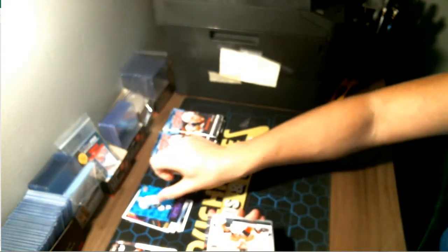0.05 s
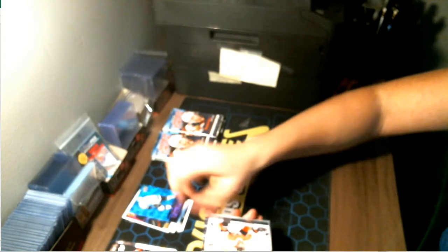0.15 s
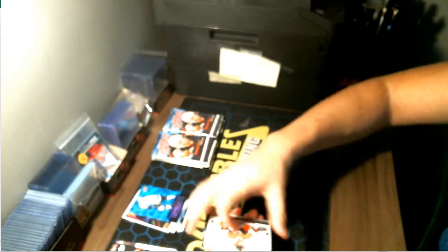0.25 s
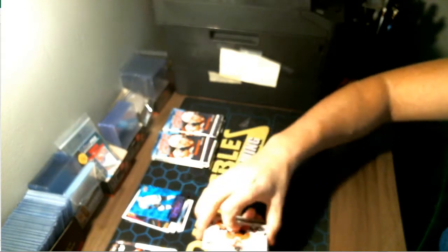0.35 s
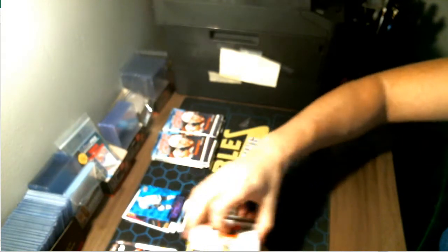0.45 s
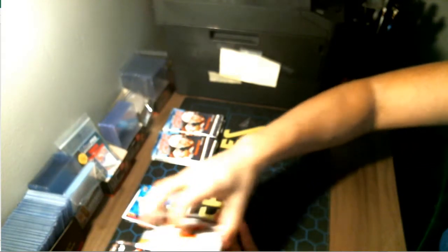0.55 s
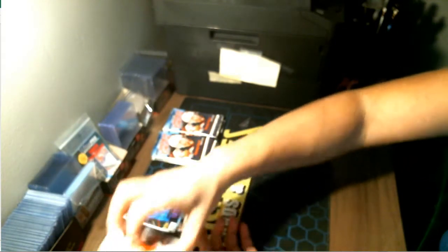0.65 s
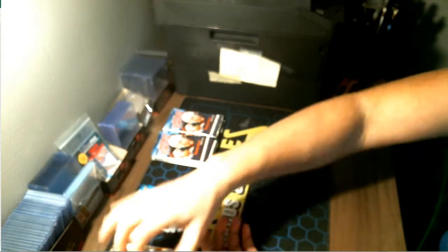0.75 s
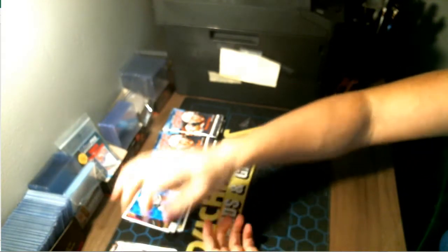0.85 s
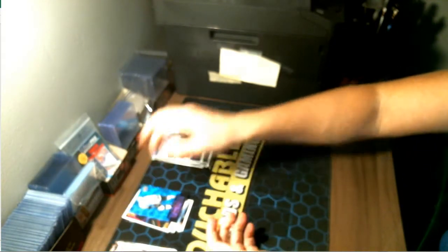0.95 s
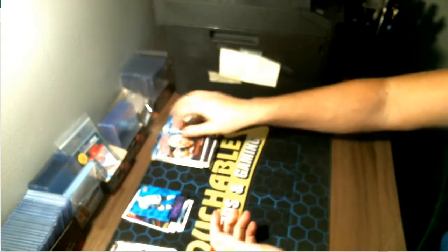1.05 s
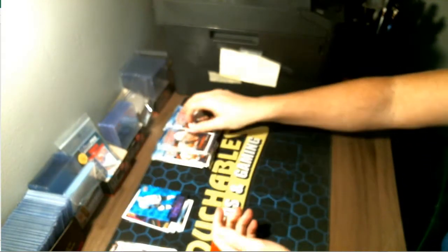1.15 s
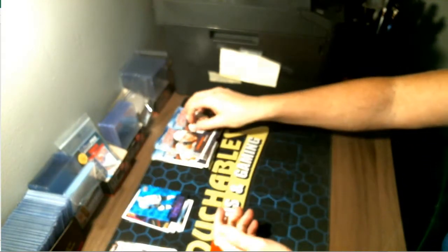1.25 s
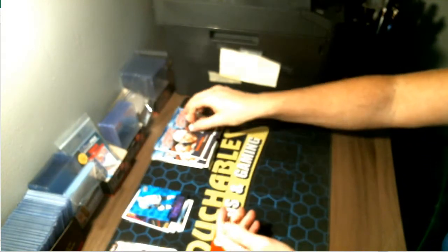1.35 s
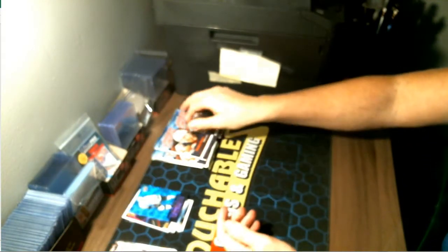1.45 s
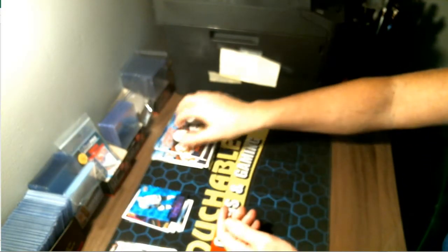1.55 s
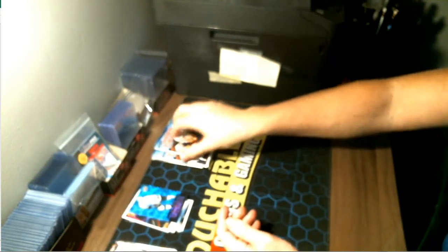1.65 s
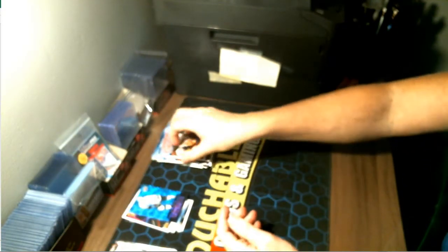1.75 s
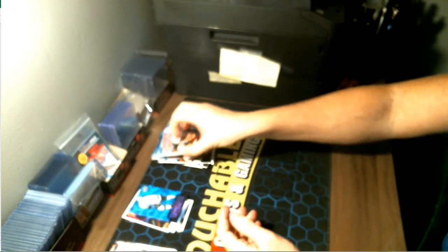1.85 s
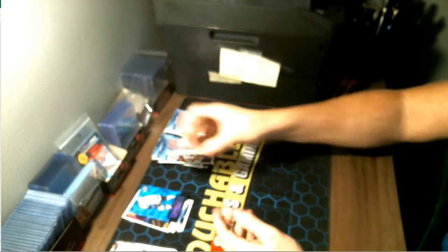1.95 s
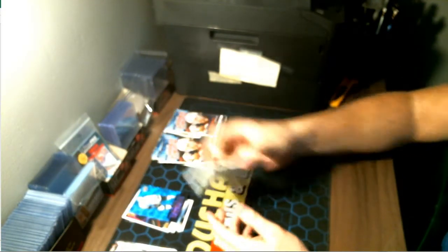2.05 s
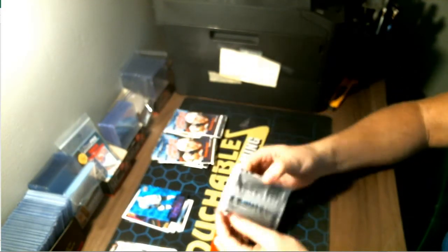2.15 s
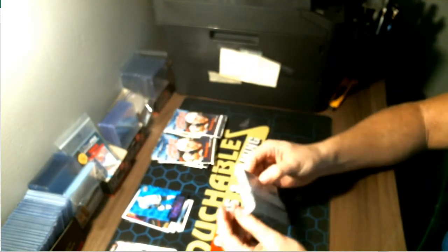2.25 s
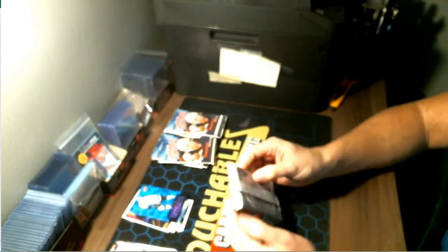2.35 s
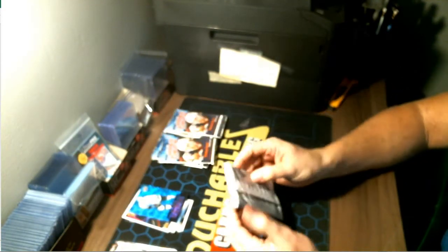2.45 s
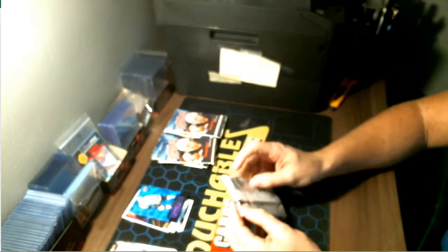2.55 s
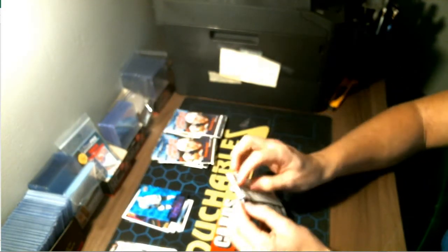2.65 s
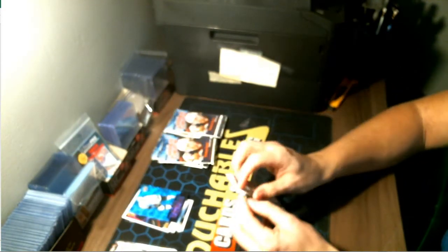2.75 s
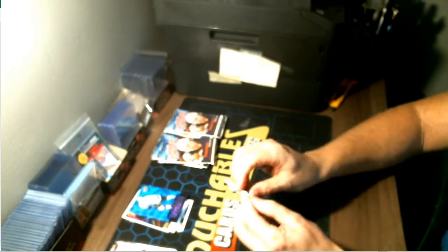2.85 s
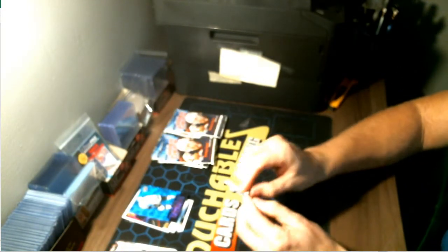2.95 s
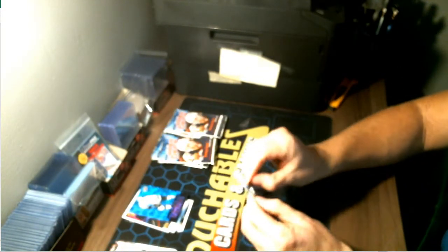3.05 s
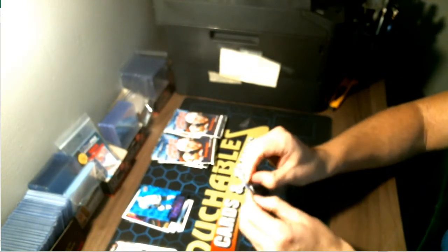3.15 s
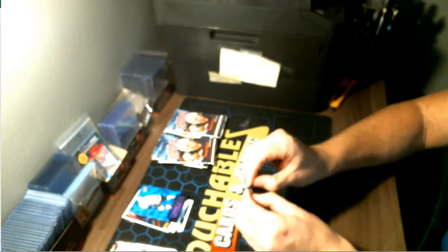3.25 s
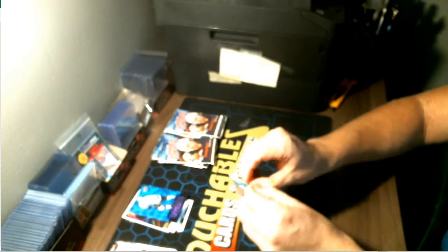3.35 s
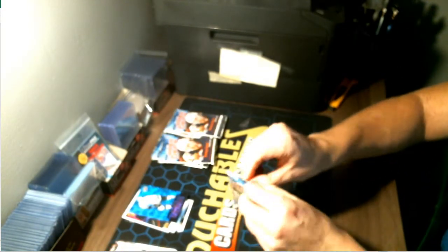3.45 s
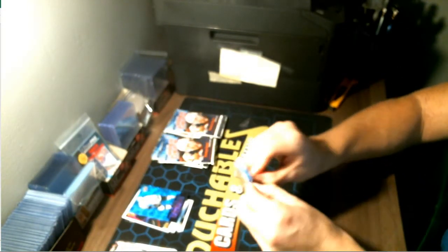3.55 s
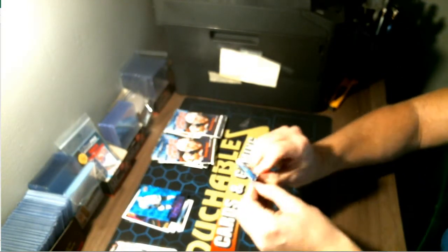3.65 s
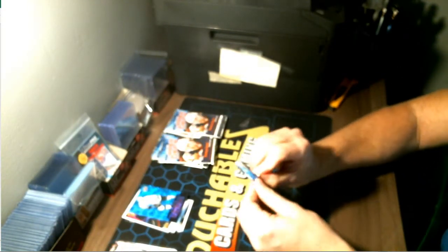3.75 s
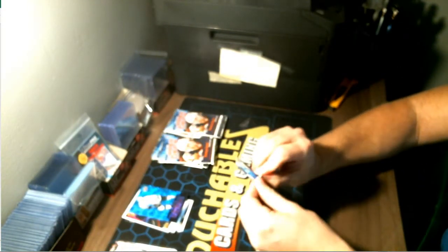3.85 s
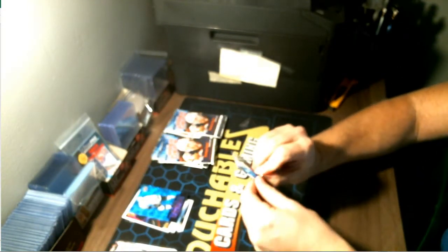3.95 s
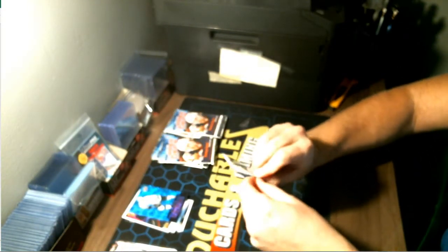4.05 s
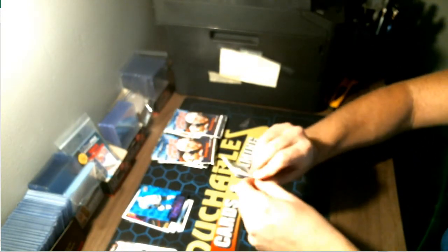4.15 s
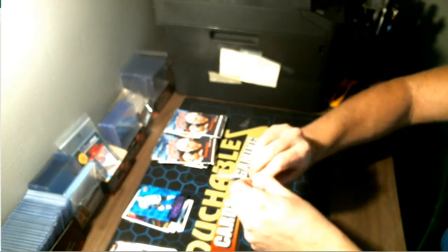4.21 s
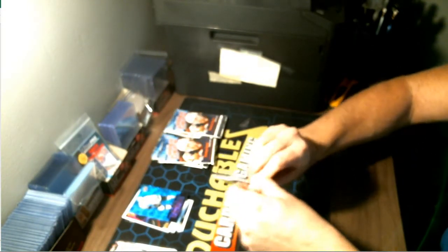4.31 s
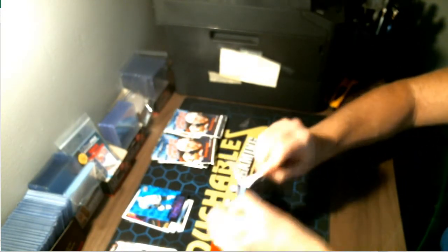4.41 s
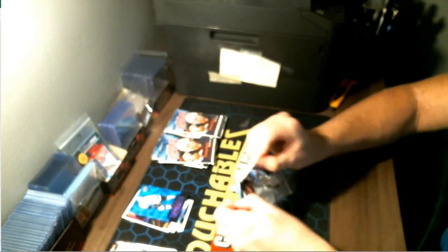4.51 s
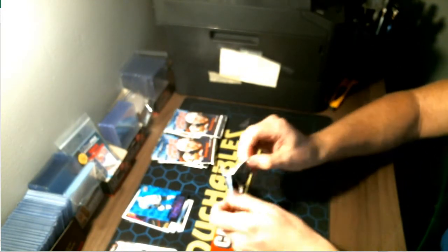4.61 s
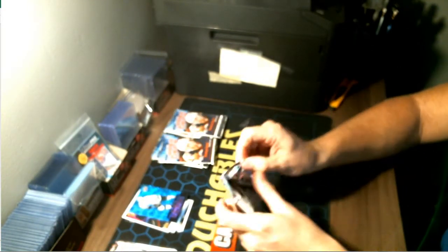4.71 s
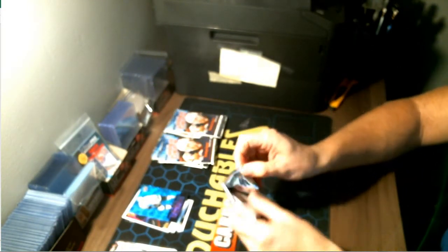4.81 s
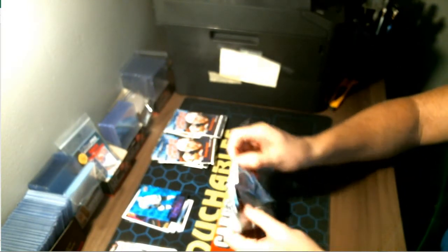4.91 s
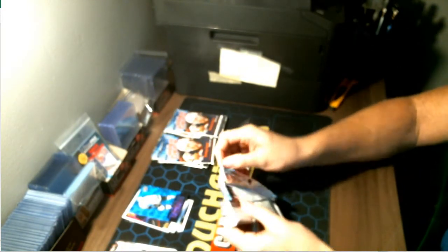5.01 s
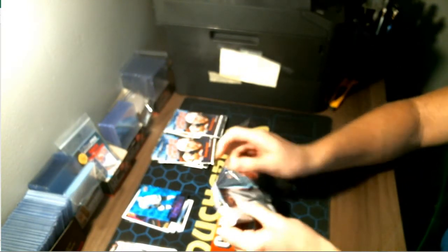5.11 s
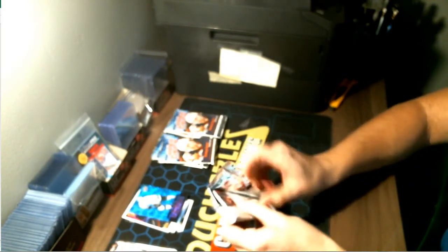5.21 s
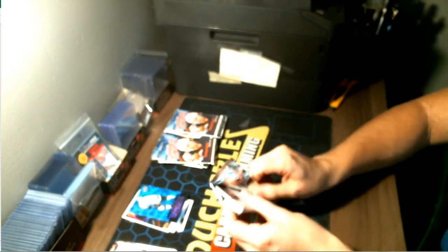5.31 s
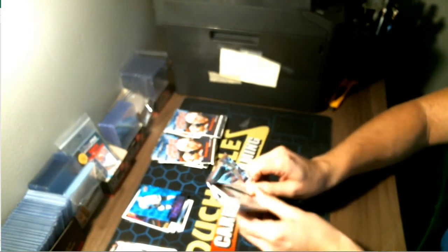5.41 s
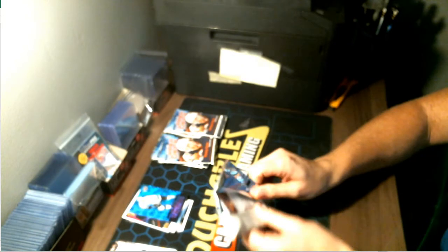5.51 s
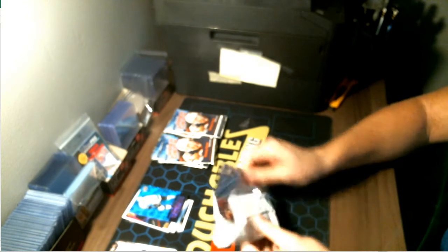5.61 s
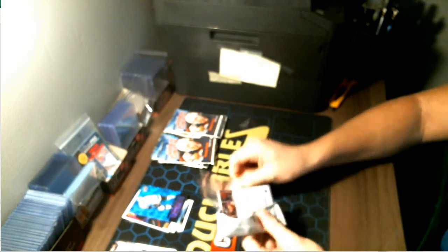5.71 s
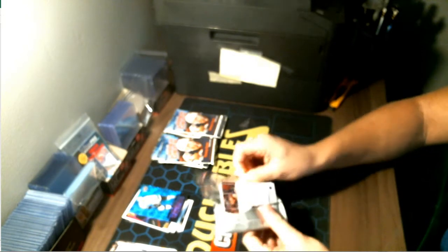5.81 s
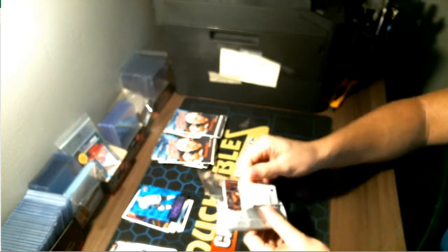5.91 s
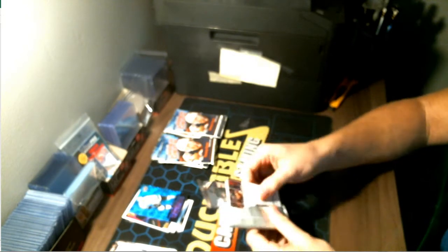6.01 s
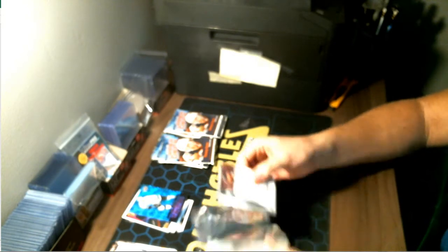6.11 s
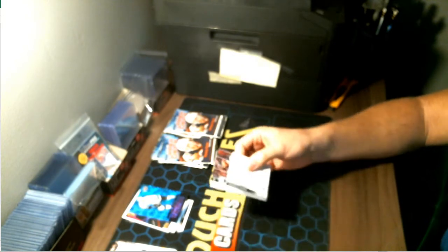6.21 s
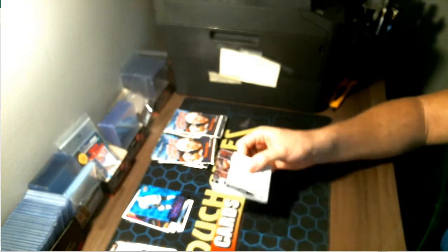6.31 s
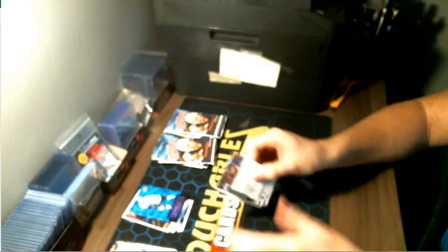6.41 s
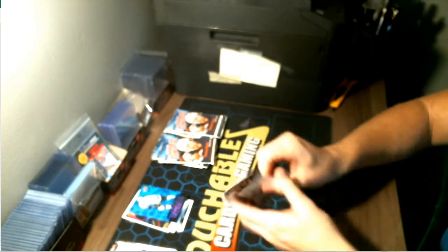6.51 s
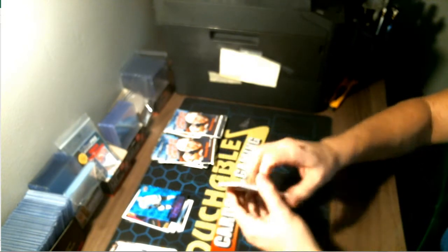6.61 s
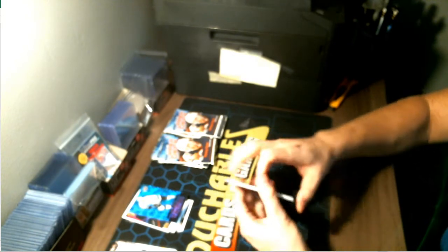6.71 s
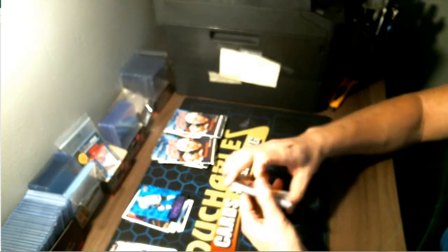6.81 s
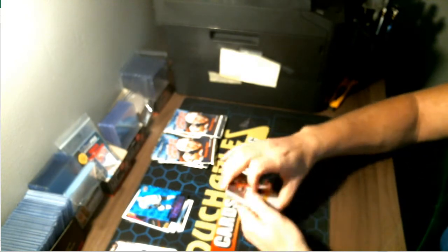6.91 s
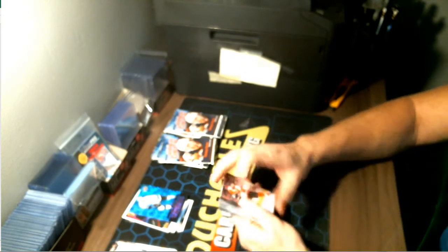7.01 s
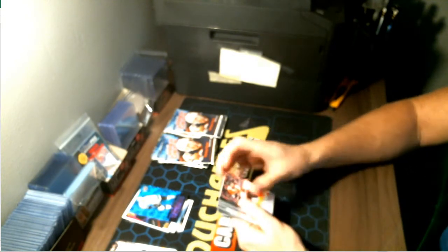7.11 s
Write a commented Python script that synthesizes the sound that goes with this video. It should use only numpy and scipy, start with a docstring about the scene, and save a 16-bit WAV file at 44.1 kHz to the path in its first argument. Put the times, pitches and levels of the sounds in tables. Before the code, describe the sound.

A card tap thuds on a desk, cards slide softly, then a foil wrapper crackles and tears in sharp bright snaps close by in a small room.

```python
"""Cards slide and are set down on a desk in a small room; then foil is crumpled and torn close to a webcam,
its sharp snaps (clicks with ringing facets) riding on a dense crackle (noise grains); at the end cards slide again.
Decaying low modes make the thumps of desk taps and of overload under the loudest snaps; leaning hands rumble and
noise tails make the room. Throughout lie air hiss and the webcam's whine and once-a-frame buzz, while its noise
suppressor shuts on the tails."""
import sys
import numpy as np
from scipy import signal
from scipy.fft import rfft, irfft, next_fast_len
from scipy.io import wavfile
from scipy.ndimage import uniform_filter1d

SR = 44100
rng = np.random.default_rng(int(sys.argv[2]) if len(sys.argv) > 2 else 0)


def bounce(signal):
    """Save signal as a 16-bit WAV file at the path given by the first command-line argument."""
    frames = np.transpose(np.atleast_2d(signal))
    limited = np.clip(frames, -1, 1)
    pcm = np.round(limited * 32767).astype(np.int16)
    wavfile.write(sys.argv[1], SR, pcm)


N = 316108  # length in samples

# Levels are mix settings; the functions trim them further.
# Foil and card snaps: start_s, peak_db, body_db (below 2 kHz, re peak), edge_db (above 7 kHz, re peak), facet_hz
FOIL_AND_CARD_SNAPS = [(0.1314, -39, -1, -62, 4020), (0.3442, -34, 3, 0, 2300),
                       (0.5534, -42.5, -3, -11.5, 4100), (0.558, -49.5, 6, 6, 1720),
                       (0.5641, -45, -0.5, -18, 4330), (0.5904, -13, 6.5, -8.5, 2580),
                       (0.5948, -11.5, -0.5, -9, 1600), (0.946, -37, -2, -3, 1000),
                       (0.9527, -33, -14.5, 0, 4070), (0.9599, -39.5, -4, -0.5, 3940),
                       (0.9856, -39.5, -6, -12, 5400), (1.0332, -28.5, -6.5, -3, 5970),
                       (1.0493, -46.5, 3, -6, 3850), (1.0568, -33, -8.5, -13.5, 1430),
                       (1.0614, -34, 2, 1.5, 1350), (1.1171, -46, -11, -4, 2520),
                       (1.2472, -50.5, -14, 0, 8260), (1.2804, -52.5, -11.5, -8, 5800),
                       (1.5109, -45, 4, -26, 1740), (1.52, -47, 1, -9, 1360),
                       (1.6436, -41, -6.5, -5.5, 3140), (1.6997, -46.5, -8, -16.5, 5720),
                       (1.7118, -45, -9, -21, 4540), (1.958, -33, -3, -2, 7500),
                       (1.9655, -38.5, -3.5, -8, 4860), (1.9847, -45, -12, -20, 4240),
                       (1.997, -21.5, -27, 1.5, 4430), (2.0169, -31, -16.5, -44, 2880),
                       (2.0342, -10, -7.5, -2.5, 10150), (2.0568, -18.5, -8, -2, 8150),
                       (2.0715, -23.5, -13, 2, 3200), (2.085, -26, -7, 1, 7770),
                       (2.1679, -24, -17, -4.5, 4460), (2.1997, -28.5, -4, -4, 4030),
                       (2.209, -22, -30, -10, 3750), (2.2579, -39, -18.5, 1.5, 7020),
                       (2.3246, -45, -17, -1, 4160), (2.376, -25.5, -4.5, -6, 4380),
                       (2.45, -29.5, -5, -6, 2450), (2.4787, -34, -5, -5.5, 2930),
                       (2.5118, -32, -8, -5, 4200), (2.5387, -18.5, -13.5, -3.5, 2004),
                       (2.5671, -27, -22.5, -1.5, 6140), (2.5804, -17.5, -9, 1, 7860),
                       (2.5917, -28.5, -5, -3, 3260), (2.6541, -37, -18.5, -3.5, 3230),
                       (2.6773, -14.5, -15.5, 2.5, 5080), (2.6978, -16.5, -14, 4.5, 5400),
                       (2.7112, -22.5, 0, -8, 4040), (2.7183, -20.5, -15.5, -1.5, 6200),
                       (2.7676, -23.5, -13.5, 1.5, 5000), (2.7842, -36.5, -23, 4, 5100),
                       (2.8306, -33, -2, -3, 4340), (2.8362, -31.5, -14.5, 4, 10900),
                       (2.8521, -10.5, -18.5, -2.5, 5600), (2.9005, -12.5, -8.5, 4, 10780),
                       (2.9445, -27, -17.5, 0, 2160), (3.026, -43.5, 3, -14, 1620),
                       (3.042, -36.5, 5, 9, 8700), (3.056, -36.5, -7, -12, 4370),
                       (3.0738, -26.5, -22, -1, 4500), (3.0923, -29.5, -11, 0.5, 3960),
                       (3.1778, -44, 4.5, -1, 6400), (3.2024, -45, -9, 18, 10400),
                       (3.3799, -38.5, -22.5, -2.5, 5180), (3.3861, -25.5, -15.5, -1.5, 6290),
                       (3.3937, -6.5, -21, -2, 9500), (3.4029, -22.5, -10, -1, 9090),
                       (3.4149, -25, -11.5, -4, 6350), (3.4332, -20, -2.5, 3, 4930),
                       (3.4449, -17.5, -8, 5.5, 5640), (3.4522, -17, -17.5, -2.5, 4540),
                       (3.4619, -19.5, -19, -6, 4500), (3.469, -7.5, -22.5, -9.5, 3740),
                       (3.4961, -22, -19.5, 1, 4460), (3.5317, -31, -17, 1.5, 5210),
                       (3.5433, -15.5, -12.5, 6.5, 6100), (3.6263, -37, -27.5, 2, 4900),
                       (3.635, -18.5, -10, -7.5, 4760), (3.6483, -17, -14, -0.5, 4750),
                       (3.7872, -37.5, -14.5, 7.5, 9300), (3.81, -28.5, -16.5, -0.5, 7670),
                       (3.8484, -14.5, -24, -5, 5870), (3.8565, -27.5, -14, -8, 4440),
                       (3.9343, -32.5, -17, -2, 5020), (3.9703, -12.5, -22.5, -2, 6270),
                       (4.0083, -27, -7, 1.5, 4740), (4.0293, -21.5, -8, 0, 4200),
                       (4.0392, -33, -5.5, -5.5, 5380), (4.1105, -9, -18, -7.5, 1880),
                       (4.1448, -22.5, -8.5, -6.5, 5700), (4.1827, -28.5, -7.5, -4, 5900),
                       (4.2074, -28.5, -9.5, 6.5, 10000), (4.2123, -9.5, -11, -1, 9910),
                       (4.2184, -7.5, -15, -5, 7470), (4.2312, 3.5, -10.5, -1.5, 1740),
                       (4.2467, 5.5, -13.5, -4.5, 1720), (4.2755, -9, -11.5, -4, 3770),
                       (4.2977, -9, -7.5, -2, 5000), (4.3296, -14.5, -17, -2, 5600),
                       (4.3434, -19, -20, -2, 6000), (4.3885, -26.5, -6, -14, 4700),
                       (4.4477, -35, 2, -17, 4900), (4.46, -11.5, -11, -3, 5500),
                       (4.5202, -26, -4, 1, 3380), (4.5454, -31.5, -3, -10, 2100),
                       (4.561, -25.5, -16, -1, 4050), (4.6705, -36.5, 1.5, -1.5, 1210),
                       (4.6774, -37, -3.5, -1, 9300), (4.6871, -26, -9.5, -25.5, 2540),
                       (4.6968, -34, -7.5, -18.5, 2750), (4.7079, -24.5, -5.5, -1, 9600),
                       (4.7503, -32.5, 4, -20, 1000), (4.7753, -31.5, -8.5, 1, 1130),
                       (4.78, -23, -4.5, -5.5, 1180), (4.7881, -20, -4, -2, 5400),
                       (4.796, -25, -6.5, -9.5, 5100), (4.8044, -26.5, -4, -5.5, 1160),
                       (4.8153, -15.5, -10.5, -4, 6350), (4.8235, -25.5, -3.5, -4, 1230),
                       (4.8432, -23.5, -5, 0, 5660), (4.8516, -24.5, -20.5, -0.5, 6040),
                       (4.8697, -42, -9, 8, 9100), (4.9089, -32, -5.5, -4, 4930),
                       (4.926, -34, -10.5, -3, 3850), (4.9332, -32.5, -14, -3, 5080),
                       (4.938, -28.5, -12.5, -2, 6100), (4.9433, -27, -5, -2.5, 2000),
                       (4.9651, -20.5, -7, -0.5, 3800), (4.9718, -20.5, -4.5, -1, 8240),
                       (5.0889, -44, -23, -5, 5470), (5.0936, -39, -30, -16, 5600),
                       (5.118, -35.5, -22, -7, 5530), (5.1457, -49.5, -14.5, 1, 5350),
                       (5.1597, -25, -34.5, -4.5, 5990), (5.1644, -27.5, -16.5, 10, 7830),
                       (5.1725, -37.5, -2, 4, 9300), (5.1795, -23.5, -8, -10, 4030),
                       (5.2249, -36, -1.5, -18, 2410), (5.2388, -39.5, -7.5, -7, 2590),
                       (5.3381, -37.5, -9.5, -2, 5860), (5.3436, -27, -9.5, 0, 6650),
                       (5.3521, -31, -7, 1, 6570), (5.3585, -26.5, -16, -1, 6980),
                       (5.3742, -19, -18.5, 0, 4370), (5.3832, -18.5, -6, 6, 9600),
                       (5.3929, -18.5, -7.5, -3, 4440), (5.4004, -19.5, -10, -2.5, 9470),
                       (5.4077, -13.5, -2.5, -1.5, 10500), (5.4145, -26, -2, 3, 8000),
                       (5.4203, -21.5, -2.5, 5, 7700), (5.4282, -17.5, -7.5, -0.5, 6100),
                       (5.4366, -6, -16.5, -16.5, 4100), (5.4509, -6, -18, 3.5, 6700),
                       (5.4629, -7, -6, -6, 3620), (5.4692, 4.5, -7, -4, 970),
                       (5.4784, -5, -2.5, -2.5, 1563), (5.4904, -6.5, 0.5, 1.5, 1790),
                       (5.5, -7.5, -0.5, 2, 1205), (5.5285, -11.5, -7, 2, 4140),
                       (5.5404, -12, -6, -8.5, 3870), (5.5561, -12, -9.5, -0.5, 5640),
                       (5.5654, -11.5, -16.5, 0.5, 6330), (5.5841, -27.5, -1.5, -3.5, 1550),
                       (5.5953, -20, -2, -9.5, 2020), (5.6032, -12.5, -4.5, -3.5, 1660),
                       (5.6125, -25, -6.5, 3, 5320), (5.7729, -17.5, -3.5, -7, 4390),
                       (5.8162, -16, -0.5, 1.5, 5800), (5.8849, -40, -3, -1.5, 4100),
                       (5.9745, -25.5, -15.5, 2, 5800), (5.9787, -20, -8.5, -5, 1460),
                       (5.9912, -22.5, -16.5, -5.5, 5300), (6.0647, -60, 7, -14, 1090),
                       (6.0871, -36, 7.5, -17, 1570), (6.094, -27, -5.5, -3.5, 6900),
                       (6.1005, -29, 3, 2.5, 7800), (6.108, -24, 1.5, 0.5, 1520),
                       (6.1173, -18, -14.5, -10.5, 2940), (6.1227, -19, 0.5, -14, 1100),
                       (6.1728, -29, -6.5, -6, 1740), (6.1801, -41, -4, 0.5, 3840),
                       (6.3426, -51.5, -15, 1.5, 5250), (6.427, -44, -21.5, 2.5, 5890),
                       (6.476, -51, -4.5, 1, 6500), (6.549, -49, -20.5, 8, 8480),
                       (6.5877, -53, -16.5, -9, 4350), (6.6057, -47, -8, -2, 4090),
                       (6.6133, -45, -1, 1, 1870), (6.853, -47.5, -2, -3, 2690)]
# Snap bands, bright edge, core and full body: freq_hz, density_db (per Hz)
SNAP_EDGE_COLOUR = [(4500, -34), (7000, 0.5), (10500, 0.5), (13000, -8.5), (17000, -36)]
SNAP_CORE_COLOUR = [(1200, -28.5), (2000, -2.5), (4000, 3), (7000, -1), (10000, -48.5)]
SNAP_BODY_COLOUR = [(20, -34.5), (200, -14), (600, -6.5), (1800, -0.5), (3200, -37.5)]
# Strokes of the hands on the foil, one list a stroke: time_s, crackle_db, bulk_db
FOIL_STROKES = [
    [(1.94, -85.5, -77), (1.95, -45.5, -57.5), (2.04, -33, -40.5), (2.138, -45, -51.5), (2.204, -36, -42),
     (2.318, -52, -84.5), (2.37, -36, -41.5), (2.52, -71.5, -51)],
    [(2.82, -49.5, -64), (2.85, -18.5, -46.5), (3.026, -59, -59.5), (3.092, -35, -46), (3.144, -71, -73),
     (3.208, -51, -56), (3.25, -79, -85.5)],
    [(3.36, -100, -96), (3.394, -11.5, -25.5), (3.408, -30, -36.5), (3.466, -23, -39.5), (3.52, -44, -57)],
    [(4.19, -38, -54.5), (4.234, -6.5, -13), (4.444, -49.5, -53.5), (4.46, -11.5, -33.5),
     (4.476, -33.5, -37), (4.594, -46, -48), (4.62, -79, -65)],
    [(4.66, -51, -45.5), (4.686, -25.5, -32), (4.746, -44, -36.5), (4.814, -22.5, -29.5),
     (4.892, -45.5, -52), (4.978, -38.5, -28.5), (5.06, -95, -65.5)],
    [(5.08, -70, -69), (5.092, -52.5, -43), (5.15, -45.5, -58), (5.166, -25.5, -48.5), (5.3, -78.5, -64.5)],
    [(5.32, -68, -76), (5.342, -37, -44.5), (5.46, -12.5, -14), (5.48, -18.5, -8), (5.614, -35, -30.5),
     (5.73, -60.5, -65.5), (5.76, -70, -76.5)],
    [(5.85, -37.5, -34.5), (5.946, -40.5, -60), (5.98, -25.5, -34), (6.048, -65.5, -63.5),
     (6.12, -32.5, -26.5), (6.188, -52.5, -52), (6.25, -71.5, -83.5)],
]
# Fine foil crackle and bulk of the wrapper: freq_hz, density_db (per Hz)
CRACKLE_COLOUR = [(1000, -32), (2500, -14.5), (4500, 9.5), (10000, 8), (13000, -6.5), (17000, -30.5)]
BULK_COLOUR = [(100, -30), (350, -9.5), (700, 0.5), (1200, 1), (2400, -21.5), (4500, -38)]
# Cards sliding over cards and mat, one list a stroke: time_s, hiss_db, scrape_db
CARD_STROKES = [
    [(0.0, -56, -68), (0.06, -95.5, -89.5), (0.118, -94, -79.5), (0.13, -53, -60), (0.2, -88, -81),
     (0.234, -53.5, -58), (0.3, -91.5, -96.5)],
    [(0.93, -90, -82.5), (0.95, -46, -48.5), (1.024, -55, -63.5), (1.032, -39.5, -38), (1.068, -51.5, -52),
     (1.194, -87.5, -86.5), (1.286, -58, -80.5), (1.32, -98.5, -89)],
    [(1.49, -96, -92.5), (1.508, -54, -59.5), (1.654, -57.5, -66.5), (1.684, -76, -81.5), (1.714, -57, -60),
     (1.76, -103, -84)],
    [(6.2, -55, -50), (6.226, -72, -72), (6.264, -78.5, -80), (6.534, -57.5, -71), (6.55, -52.5, -60.5),
     (6.584, -65, -74.5), (6.614, -52.5, -52), (6.652, -69.5, -81), (6.72, -81, -85.5)],
    [(6.82, -91, -100), (6.858, -66, -63.5), (6.888, -95, -94), (6.9, -98, -96.5)],
]
# Card hiss and duller scrape: freq_hz, density_db (per Hz)
CARD_HISS_COLOUR = [(1800, -30), (3500, -0.5), (7000, 0.5), (11000, -1.5), (16500, -21)]
CARD_SCRAPE_COLOUR = [(300, -25), (900, 0.5), (2000, -4), (3000, -5.5), (5000, -30)]
# Low thumps, taps on the desk and the overload thump under the loudest foil snaps: start_s, peak_db
LOW_THUMPS = [(0.593, -0.5), (0.596, -17), (0.952, -17), (0.982, -27), (1.135, -39.5), (4.232, -24),
              (5.481, -17.5)]
# Modes that ring in every thump: pitch_hz, level_db, t60_s
THUMP_MODES = [(144.8, -6, 0.18), (160, -1.5, 0.16), (205, -2, .12), (219.4, 3.5, 0.04), (330, -6.5, 0.066),
               (640, -7.5, 0.078), (837, -6.5, 0.068)]
# Arm and hands leaning on the desk: time_s, rumble_db
LEANING_LEVELS = [(0.0, -48.5), (0.06, -66.5), (0.48, -57.5), (0.5, -70.5), (0.56, -63.5), (0.6, -20.5),
                  (0.68, -38.5), (0.88, -68.5), (0.98, -41.5), (1.28, -69), (1.94, -62.5), (2.06, -45.5),
                  (2.12, -63.5), (2.21, -44), (2.23, -52), (3.35, -67.5), (3.39, -47.5), (3.49, -65.5),
                  (4.19, -58.5), (4.23, -27), (4.39, -60.5), (4.53, -58), (4.61, -69), (4.81, -48.5),
                  (4.91, -60.5), (4.97, -38.5), (5.07, -67), (5.11, -52), (5.33, -75), (5.39, -46),
                  (5.49, -33), (5.67, -52.5), (5.79, -51.5), (5.83, -44.5), (5.85, -51.5), (6.03, -70),
                  (6.13, -47), (6.21, -72.5), (7.17, -68)]
# Rumble through the desk top: freq_hz, density_db (per Hz)
RUMBLE_COLOUR = [(40, -29.5), (100, -4), (150, 0), (330, 0.5), (600, -24.5)]
# Decay of the room: freq_hz, t60_s
ROOM_DECAY = [(150, 0.33), (700, 0.24), (2000, 0.27), (5000, 0.19), (10000, 0.14), (16000, .12)]
# Steady air hiss: freq_hz, density_db (per Hz)
AIR_COLOUR = [(30, -21.5), (150, -14.5), (400, -11), (1000, -18), (2000, -19.5), (5000, -25.5),
              (12000, -25.5), (16500, -32)]
# Spectrum of one frame pulse and its wake: freq_hz, level_db
BUZZ_COLOUR = [(50, -28), (120, -7), (270, 0.5), (500, -8.5), (1000, -20), (1800, -58)]
FRAME_RATE_HZ, FIRST_FRAME_S = 29.983, .0031
WHINE_HZ, TOP_HZ = 2758.6, 16900  # electric whine; upper limit of the sound


def amp(db):
    """Turns decibels into a linear gain."""
    return 10 ** (np.asarray(db) / 20)


def unit(x):
    """Scales to rms 1."""
    return x / np.sqrt(np.mean(x ** 2) + 1e-20)


def coloured(x, points):
    """Shapes x by (Hz, dB) points on a log axis; white noise of rms 1 stays at rms 1."""
    size = next_fast_len(N + 8192)
    hz, db = np.transpose(points)
    bins_hz = np.fft.rfftfreq(size, 1 / SR)
    gain = amp(np.interp(np.log(bins_hz + 1), np.log(hz + 1), db, right=-np.inf))
    return irfft(rfft(x, size) * unit(gain), size)[:N]


def overlay(starts, rows):
    """Adds one short row of sound at each start sample."""
    at = starts[:, None] + np.arange(rows.shape[1])
    return np.bincount(at.ravel(), rows.ravel(), N + rows.shape[1])[:N]


def bursts(times, gains, hold, t60):
    """Short noise bursts: a brief plateau of close reflections, then a fast decay."""
    t = np.arange(600) / SR
    shape = amp(-60 * np.maximum(t - hold[:, None], 0) / t60)
    rows = gains[:, None] * shape * rng.standard_normal(shape.shape)
    return overlay(np.round(times * SR).astype(int), rows)


def grains(rate, spread_db, rub):
    """Many tiny creases of very unequal size over the steady rub of the fingers, rms 1."""
    draw = rng.random((int(7 * rate), 2))  # about rate creases a second
    size = amp(-spread_db * np.log(draw[:, 1] + 1e-4))
    hold = np.full(len(size), 0.00057)
    creases = unit(bursts(draw[:, 0] * N / SR, size, hold, t60=0.0043))
    return unit(creases + rub * rng.standard_normal(N))


def strokes(tables, upper, lower):
    """Fades two layers along each stroke; each stroke is down at -120 dB outside its own span."""
    t, out = np.arange(N) / SR, np.zeros(N)
    for time_s, upper_db, lower_db in map(np.transpose, tables):
        out += amp(np.interp(t, time_s, upper_db, -120, -120)) * upper
        out += amp(np.interp(t, time_s, lower_db, -120, -120)) * lower
    return out


def snaps():
    """A buckling crease clicks and rings its facet; hands and desk spread the near click into a short burst.

    Returns the near sound and the sharper sound that travels on to the walls."""
    start_s, peak_db, body_db, edge_db, facet_hz = np.transpose(FOIL_AND_CARD_SNAPS)
    hold = .0007 + .0009 * rng.random(len(start_s))  # seconds
    starts = np.round(start_s * SR).astype(int)
    bands = [(SNAP_CORE_COLOUR, peak_db - 4.5),
             (SNAP_BODY_COLOUR, peak_db + body_db - 4),
             (SNAP_EDGE_COLOUR, peak_db + edge_db - 4.5)]
    near, clicks = 0, 0
    for colour, level_db in bands:
        near = near + coloured(bursts(start_s, amp(level_db), hold, t60=.012), colour)
        clicks = clicks + coloured(np.bincount(starts, amp(level_db), N), colour)
    # the facet rings as strongly as the band that it lies in
    high_db = np.where(facet_hz > 7000, edge_db, 0)
    facet_db = peak_db + np.where(facet_hz < 2000, body_db, high_db) + 5.5
    t = np.arange(600) / SR
    decay = amp(facet_db[:, None] - 60 * t / .008)
    attack = 1 - np.exp(-t / .0003)
    facets = overlay(starts, decay * np.sin(2 * np.pi * facet_hz[:, None] * t) * attack)
    return near + facets, amp(11.5) * clicks + amp(-12.5) * facets


def handling():
    """Crackle of the thin foil and the duller rustle of the wrapper as a whole, from the same creases."""
    creases = grains(400, spread_db=3.5, rub=.25)
    crackle = amp(-7.5) * coloured(creases, CRACKLE_COLOUR)
    bulk = amp(-6) * coloured(creases, BULK_COLOUR)
    return strokes(FOIL_STROKES, crackle, bulk)


def cards():
    """Smooth card faces rub with a nearly even hiss and a duller scrape."""
    rubbing = grains(600, spread_db=2, rub=1.5)
    hiss = amp(-2) * coloured(rubbing, CARD_HISS_COLOUR)
    scrape = coloured(rubbing, CARD_SCRAPE_COLOUR)
    return strokes(CARD_STROKES, hiss, scrape)


def thumps():
    """Desk taps and overload thumps, each a sum of decaying low modes at new strengths."""
    out, t = np.zeros(N + SR), np.arange(SR // 2) / SR
    attack = 1 - np.exp(-t / .001)
    for start_s, peak_db in LOW_THUMPS:
        ring = np.zeros(len(t))
        for pitch_hz, level_db, t60 in THUMP_MODES:
            strength_db = level_db + rng.normal(0, 1.6)
            ring += amp(strength_db - 60 * t / t60) * np.sin(2 * np.pi * pitch_hz * t)
        out[round(start_s * SR):][:len(t)] += amp(peak_db - 15.5) * ring * attack
    return out[:N]


def leaning():
    """Low noise rumble passed through the desk top as arm and hands lean on it."""
    level_db = np.interp(np.arange(N) / SR, *np.transpose(LEANING_LEVELS))
    return amp(level_db - 6.5) * coloured(rng.standard_normal(N), RUMBLE_COLOUR)


def room(x):
    """A diffuse noise tail, each frequency dying at its own speed, redrawn and crossfaded every 46 ms."""
    step, delay = 2048, 200  # samples
    out, x = np.zeros(N + SR), np.pad(x, (step, 2 * step))
    blend = signal.windows.hann(2 * step, sym=False)
    decay_hz, t60 = np.transpose(ROOM_DECAY)
    for a in range(0, N, step):
        hz, t, z = signal.stft(rng.standard_normal(SR // 3), SR, nperseg=256)
        fade = amp(-60 * t / np.interp(np.log(hz + 1), np.log(decay_hz), t60)[:, None])
        tail = signal.istft(z * fade, SR, nperseg=256)[1]
        wet = signal.fftconvolve(blend * x[a:a + 2 * step], tail / np.linalg.norm(tail))
        out[a + delay:][:len(wet)] += np.sqrt(4 / 3) * wet  # unrelated tails add in power
    return out[step:step + N]


def air():
    """Steady soft hiss: noise shaped by the air spectrum."""
    return amp(-62.5) * coloured(rng.standard_normal(N), AIR_COLOUR)


def pickup():
    """Electric pick-up: a thin whine and, once a video frame, a soft pulse with a noisy wake."""
    t = np.arange(N) / SR
    starts = np.round(SR * np.arange(FIRST_FRAME_S, t[-1], 1 / FRAME_RATE_HZ)).astype(int)
    clicks = np.bincount(starts, amp(rng.normal(0, 2.5, len(starts))), N)
    pulses = amp(-69) * unit(coloured(clicks, BUZZ_COLOUR))
    since = (t - FIRST_FRAME_S) % (1 / FRAME_RATE_HZ)  # seconds after the last frame
    wake = amp(-64.5 - 60 * since / .09) * coloured(rng.standard_normal(N), BUZZ_COLOUR)
    whine = amp(-86) * np.sin(2 * np.pi * WHINE_HZ * t)
    return wake - pulses + whine


def scene():
    """Mixes the near sources, their room sound and the air."""
    cracks, sent = snaps()
    rubbed = handling() + cards()
    low = thumps() + leaning()
    walls = room(sent + amp(-10) * rubbed + amp(-5.5) * low)
    return (cracks + rubbed + low + walls + air())[None]


def suppressor(x, over_db, depth_db):
    """Takes each band's steady noise from its quiet moments and turns the band down as it nears that noise."""
    z = signal.stft(x, nperseg=256, noverlap=192)[2]
    power = uniform_filter1d(np.abs(z) ** 2, size=7, axis=1)
    power = uniform_filter1d(power, size=13, axis=2, origin=4)  # about 20 ms, mostly past
    noise = np.percentile(power, 15, axis=2, keepdims=True)
    gain = np.maximum(1 - amp(2 * over_db) * noise / (np.abs(power) + 1e-20), amp(depth_db))
    return signal.istft(z * gain, nperseg=256, noverlap=192)[1][:, :N]


def record(dry):
    """Webcam chain: bass cut, suppressor, pick-up added behind it, soft ceiling, band limit."""
    x = signal.sosfilt(signal.butter(2, 55, "high", fs=SR, output="sos"), dry)
    x = suppressor(x, over_db=5, depth_db=-13) + pickup()
    x = x / (1 + np.abs(x / .7) ** 4) ** (1 / 4)  # soft ceiling at 0.7
    return irfft(rfft(x) * (np.fft.rfftfreq(N, 1 / SR) < TOP_HZ), N)


dry = scene()
out = record(dry)
bounce(out)
```